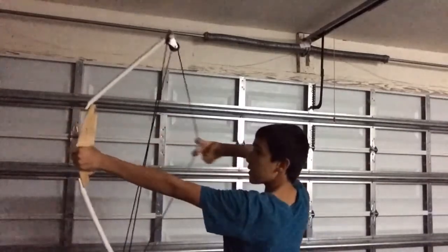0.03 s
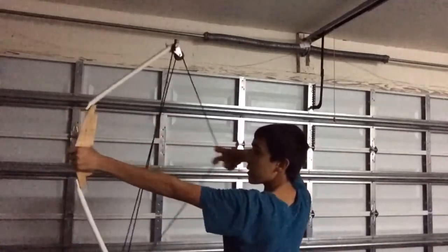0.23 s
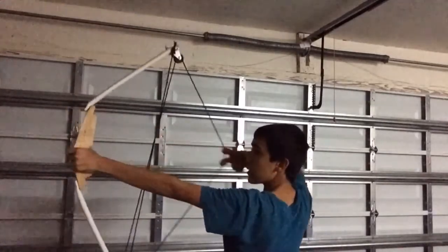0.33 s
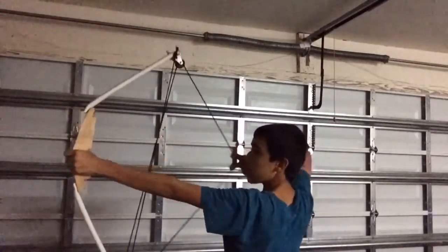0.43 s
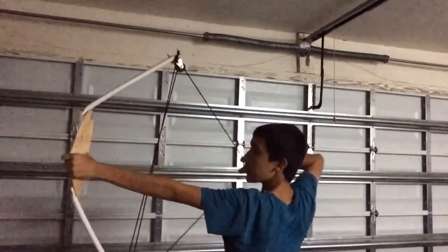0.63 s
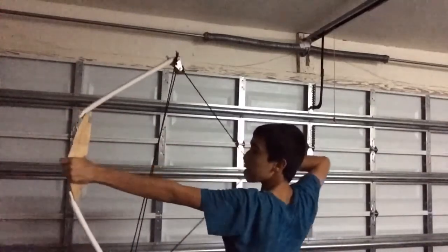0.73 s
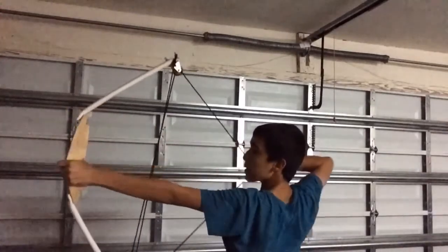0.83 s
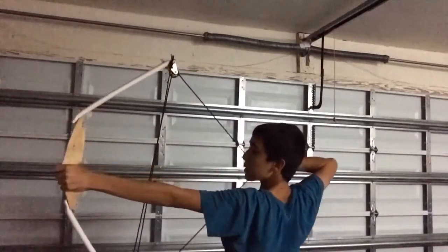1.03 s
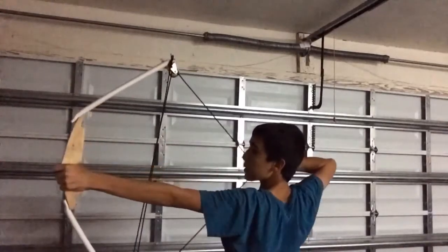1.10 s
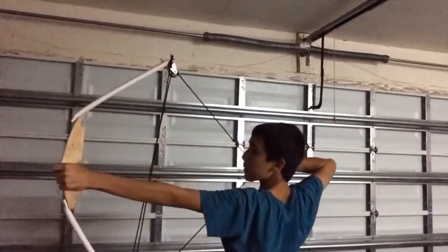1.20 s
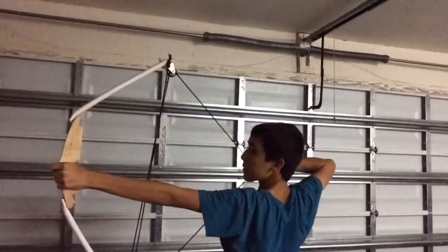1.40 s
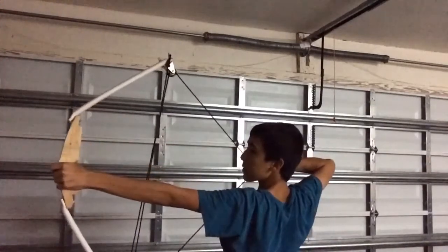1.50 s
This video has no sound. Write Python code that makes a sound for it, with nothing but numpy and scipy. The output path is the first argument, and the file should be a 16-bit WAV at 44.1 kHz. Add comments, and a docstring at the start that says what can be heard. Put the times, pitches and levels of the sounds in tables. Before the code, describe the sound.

A homemade bow's pulley snaps sharply twice, at about 0.2 and 0.3 seconds, each bright click ringing briefly in a bare garage. The sliding string hisses faintly from the start and fades as the draw slows, with a soft tick near 0.85 seconds and tiny high squeaks from 0.8 to 1.4 seconds. A low electrical hum and faint fan drone continue underneath throughout.

```python
"""A homemade bow is drawn in a bare garage. From the start there is mains hum, a fan's faint drone, low
room noise, the friction hiss of the string and the dying reverberation of an earlier snap. As the string
takes up load, it ticks and a pulley snaps sharply twice; each impulse rings the pulley's modes and
reflects off the metal door and the walls. The string then slides on with one more tick and tiny squeaks,
its hiss fading as the draw slows."""
import sys
import numpy as np
from scipy import signal
from scipy.fft import rfft, irfft
from scipy.io import wavfile

SR = 44100
rng = np.random.default_rng(int(sys.argv[2]) if len(sys.argv) > 2 else 0)


def int16_out(signal):
    """Quantize to a 16-bit WAV file."""
    q = np.round(np.clip(np.atleast_2d(signal).T, -1, 1) * 32767)
    wavfile.write(sys.argv[1], SR, q.astype(np.int16))


N = 68355
T = np.arange(N) / SR
FREQS = np.maximum(np.fft.rfftfreq(2 * N, 1 / SR), 1)  # Hz; double length leaves room for decays


def undb(db):
    """Amplitude ratio of a level in decibels."""
    return 10 ** (np.asarray(db) / 20)


def at(points, hz):
    """Interpolation of (frequency, value) points on a logarithmic frequency axis."""
    freqs, values = np.array(points, float).T
    return np.interp(np.log(hz), np.log(freqs), values)


def envelope(points):
    """Amplitude envelope through (time, level) points, linear in decibels."""
    return undb(np.interp(T, *np.array(points).T))


def noise(gain):
    """Spectral shaping: white noise filtered by a gain over frequency, scaled to rms 1."""
    shaped = irfft(rfft(rng.standard_normal(2 * N)) * gain)[:N]
    return shaped / np.sqrt(np.mean(shaped ** 2))


def drift(rate_hz):
    """Slow random modulation: low-pass noise of rms 1."""
    return noise(1 / (1 + (FREQS / rate_hz) ** 4))


def band(hz, width_hz):
    """Narrow-band noise of rms 1, as from a randomly driven resonance."""
    return noise(1 / (1 + (2 * (FREQS - hz) / width_hz) ** 4))


def delay(seconds):
    """Frequency response of a pure delay: phase lag proportional to frequency."""
    return np.exp(-2j * np.pi * FREQS * seconds)


def minimum_phase(db):
    """Causal response with the given levels over frequency, by folding the cepstrum."""
    cepstrum = irfft(np.log(undb(db)))
    cepstrum[1:N] *= 2
    cepstrum[N + 1:] = 0
    return np.exp(rfft(cepstrum))


def mains_hum():
    """Harmonic hum: the mains fundamental and its octave, both wavering in amplitude."""
    # course of the second harmonic (time [s], rms level [dB])
    octave_level = [(0, -63.5), (0.155, -52), (0.2, -64), (0.37, -64), (0.4, -57), (0.51, -59), (0.6, -70),
                    (0.66, -68), (0.705, -53.5), (0.765, -64), (0.815, -51.5), (0.875, -65.5), (1.03, -59),
                    (1.135, -55.5), (1.25, -66), (1.38, -58), (1.5, -55.5), (1.55, -68)]
    mains_hz, mains_db = 59.1, -60
    phase = 2 * np.pi * (mains_hz * T + rng.random())
    octave = envelope(octave_level) * np.sin(2 * phase + 0.18 * drift(5.7))
    fundamental = undb(mains_db + 0.7 * drift(4)) * np.sin(phase)
    return np.sqrt(2) * (fundamental + octave)


def fan_and_air():
    """Stationary noise: a fan drones in narrow bands over a low broadband floor."""
    # resonances of the fan (frequency [Hz], bandwidth [Hz], rms level [dB])
    resonances = [(160.6, 15.7, -70.5), (330.5, 46, -69), (480, 12, -71.5), (559.2, 11, -70.5),
                  (646, 43, -74.5), (1073, 30, -78.5), (1288, 22, -79.5), (1953, 16, -84.5)]
    # spectrum of the noise floor (frequency [Hz], relative level [dB])
    floor_spectrum = [(20, -23), (40, -9), (60, -10), (128, -6.5), (200, -6.5), (255, -12), (380, -10),
                      (540, -12.5), (750, -17.5), (1200, -19), (1600, -22), (1800, -27), (2780, -27.5),
                      (4620, -33.5), (6000, -31.5), (8000, -34), (9000, -40), (15000, -45)]
    floor_db = -59
    drone = sum(undb(db) * band(hz, width) for hz, width, db in resonances)
    return drone + undb(floor_db) * noise(undb(at(floor_spectrum, FREQS)))


def string_friction():
    """Sliding friction: an uneven dry hiss, and faint squeaks that sink in pitch as the draw slows."""
    # spectrum of the rubbing string (frequency [Hz], relative level [dB])
    hiss_spectrum = [(1000, 0), (2500, -1), (6000, -2), (9000, -11.5), (15000, -18.5)]
    # course of the hiss (time [s], level [dB])
    hiss_level = [(0, -68.5), (0.6, -67), (0.9, -71), (1.1, -73), (1.55, -72.5)]
    # squeaks of the string on the pulley (centre time [s], duration [s], frequency [Hz], level [dB])
    squeak_events = [(0.835, .03, 5500, -79), (0.93, 0.049, 5450, -78), (1.122, 0.028, 5600, -75.5),
                     (1.228, .09, 5240, -75.5), (1.32, .05, 5250, -80), (1.395, 0.059, 5080, -75)]
    roughness_db, squeak_width_hz = 1.5, 490
    catching = undb(roughness_db * drift(25))
    hiss = noise(undb(at(hiss_spectrum, FREQS))) * envelope(hiss_level)
    squeaks = sum(undb(db) * band(hz, squeak_width_hz) / (1 + (2 * (T - centre) / duration) ** 4)
                  for centre, duration, hz, db in squeak_events)
    return (hiss + squeaks) * catching


def reverberation():
    """Diffuse field as a frequency response: scatter off the ribbed door, a tail losing treble first."""
    # decay of the garage (frequency [Hz], reverberation time T60 [s])
    decay_times = [(1500, 0.5), (3500, 0.42), (7000, 0.3756), (10000, 0.3978), (15000, 0.21)]
    # spectrum of the tail (frequency [Hz], relative level [dB])
    tail_spectrum = [(1500, 1), (3500, -0.59), (7000, -0.1), (10000, -0.74), (15000, -0.68)]
    tail_db, build_s = -24.5, 0.0035
    scatter_db, scatter_start_s, scatter_decay_s = -28.5, 0.009, 0.012
    centres = np.geomspace(500, 16000, 11)
    white = rfft(rng.standard_normal(2 * N))
    tail = np.zeros(N)
    for hz, share in zip(centres, np.eye(len(centres))):
        triangular_band = np.interp(np.log(FREQS), np.log(centres), share)
        decay = undb(at(tail_spectrum, hz) - 60 * T / at(decay_times, hz))
        tail += irfft(white * triangular_band)[:N] * decay
    tail *= 1 - np.exp(-T / build_s)
    burst = rng.standard_normal(N) * np.exp(-T / scatter_decay_s)
    scatter = rfft(burst, 2 * N) * delay(scatter_start_s)
    return undb(tail_db) * rfft(tail, 2 * N) + undb(scatter_db) * scatter


def snap_spectrum():
    """Impulse excitation: a contact crack, dispersed by the bracket, rings the pulley's damped modes."""
    # spectrum of the contact crack (frequency [Hz], relative level [dB])
    crack_spectrum = [(300, -42), (1100, -29), (1550, -14.5), (2300, -15.5), (3100, -3.5), (4200, -1),
                      (6800, 2.5), (8400, -1.5), (9600, 1), (12000, -4), (15000, -5.5)]
    # modes of the pulley and its bracket (frequency [Hz], relative level [dB], decay time T60 [s])
    modes = [(3017, -8, 0.17), (3827, -6.5, 0.2), (4680, -20, .07), (5590, -7, .07), (6260, -12, .08),
             (6405, -17, 0.065), (6940, 1, .02), (7550, -2, 0.048), (9190, -3.5, 0.08), (9550, -0.5, .03),
             (10240, -2, 0.036), (11400, -3, 0.086)]
    smear_hz, smear_q, ring_db = 6550, 1.9, -40
    s = 1j * FREQS / smear_hz
    all_pass = (s * s - s / smear_q + 1) / (s * s + s / smear_q + 1)
    crack = minimum_phase(at(crack_spectrum, FREQS)) * all_pass ** 2  # spread by under a millisecond
    ring = sum(undb(db - 60 * T / t60) * np.cos(2 * np.pi * hz * T) for hz, db, t60 in modes)
    return crack * (1 + undb(ring_db) * rfft(ring, 2 * N))


def early_reflections():
    """Discrete echoes as a frequency response: the nearest surfaces, then a narrow band off the door."""
    # reflections from the nearest surfaces (delay [s], relative level [dB])
    echoes = [(0.00123, -3), (0.0017, -3), (0.0031, -7)]
    door_delay_s, door_db, door_hz, door_half_width_hz = 0.0091, -1, 6800, 1300
    door = undb(door_db) * delay(door_delay_s) / (1 + 1j * (FREQS - door_hz) / door_half_width_hz) ** 2
    return door + sum(undb(db) * delay(lag) for lag, db in echoes)


def snaps_and_ticks():
    """Superposition: each impulse arrives directly, by early reflection and through the diffuse field."""
    # snaps of the pulley (time [s], gain [dB], treble tilt [dB/octave], reverberation gain [dB])
    snaps = [(0.2164, -3, -0.14, 0), (0.2979, -3, 0.37, 1)]
    # ticks of the settling string (time [s], gain [dB], treble tilt [dB/octave], reverberation gain [dB])
    ticks = [(0.17, -44.5, -10, 8), (0.8457, -51, -2, 0)]
    linger_db, linger_age_s = -5.5, 0.12  # the room still rings from a snap just before the start
    snap = snap_spectrum()
    direct_and_early = 1 + early_reflections()
    octaves = np.log2(np.clip(FREQS, 2000, 16000) / 7000)  # the tilt pivots at 7 kHz
    arrivals = 0
    for onset, db, tilt, room_db in snaps + ticks:
        paths = direct_and_early + undb(room_db) * reverberation()
        arrivals += minimum_phase(db + tilt * octaves) * delay(onset) * paths
    lingering = undb(linger_db) * irfft(snap * reverberation() * delay(-linger_age_s))[:N]
    return irfft(arrivals * snap)[:N] + lingering


def scene():
    """Linear superposition of the bow and the garage's background, on one channel."""
    return (snaps_and_ticks() + string_friction() + mains_hum() + fan_and_air())[None]


def record(dry):
    """Band limiting: a steep elliptic low-pass removes the highest treble."""
    cutoff_hz = 15250
    return signal.sosfilt(signal.ellip(10, 0.2, 70, cutoff_hz, fs=SR, output="sos"), dry)


dry = scene()
out = record(dry)
int16_out(out)
```